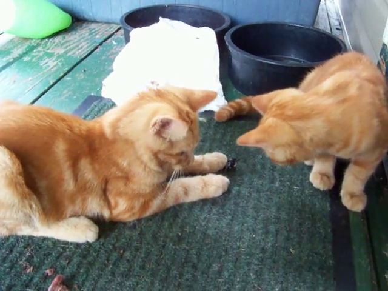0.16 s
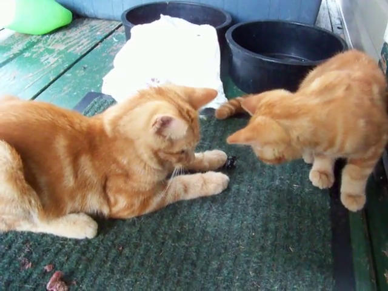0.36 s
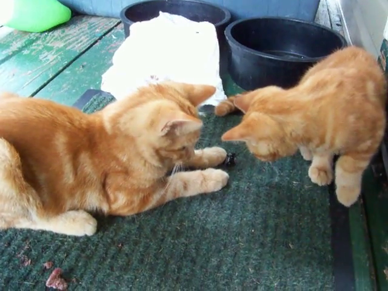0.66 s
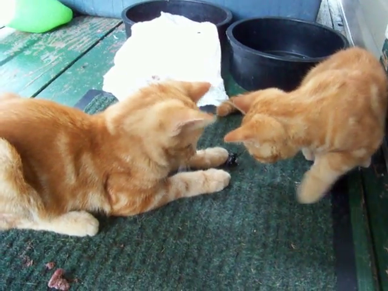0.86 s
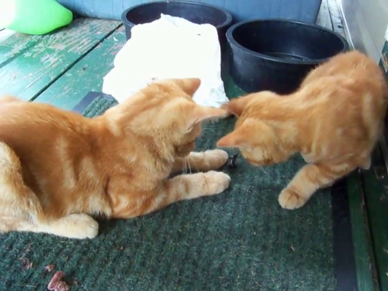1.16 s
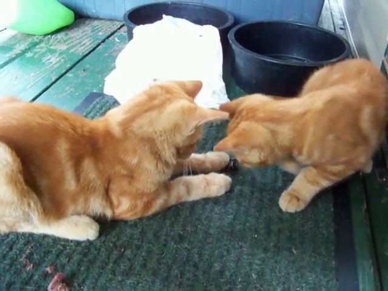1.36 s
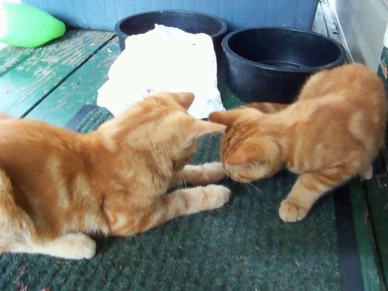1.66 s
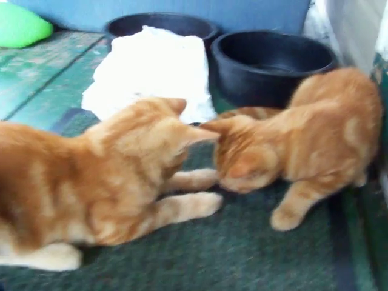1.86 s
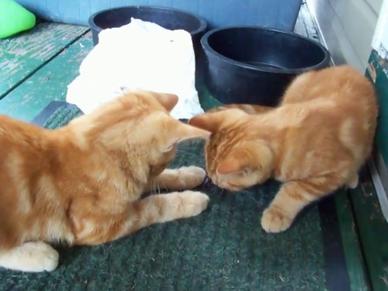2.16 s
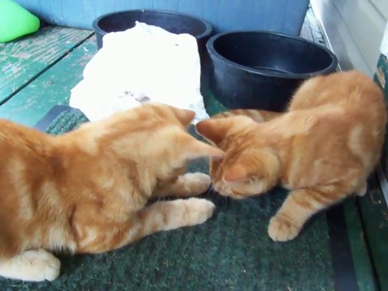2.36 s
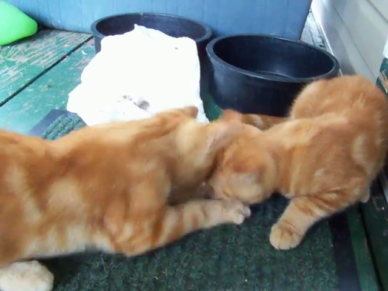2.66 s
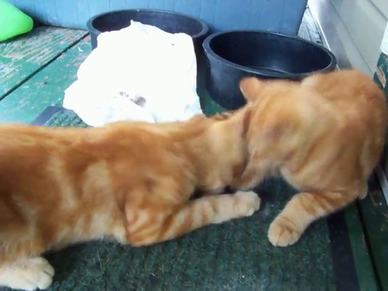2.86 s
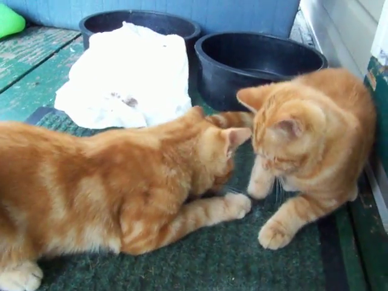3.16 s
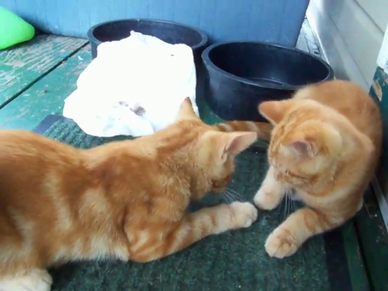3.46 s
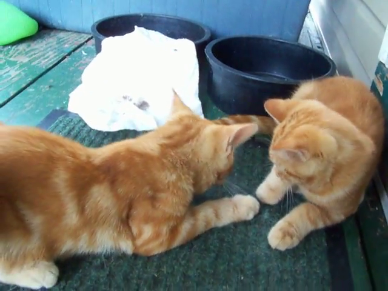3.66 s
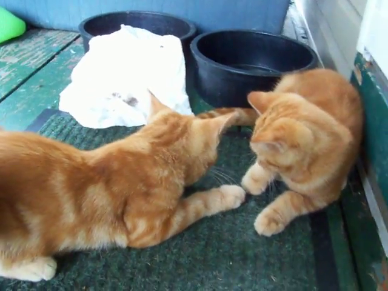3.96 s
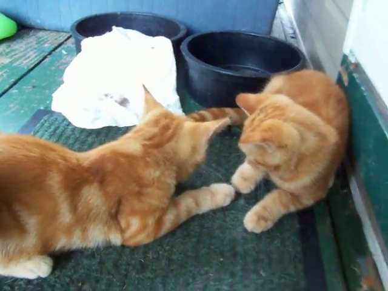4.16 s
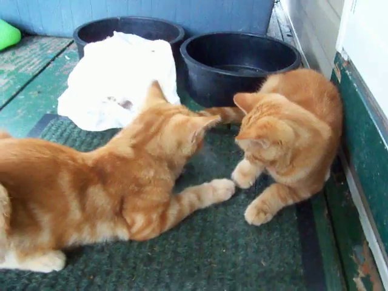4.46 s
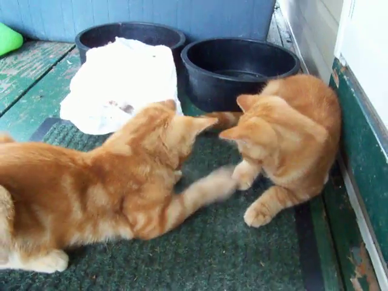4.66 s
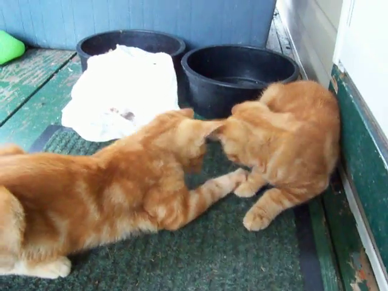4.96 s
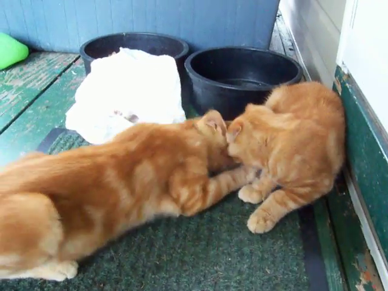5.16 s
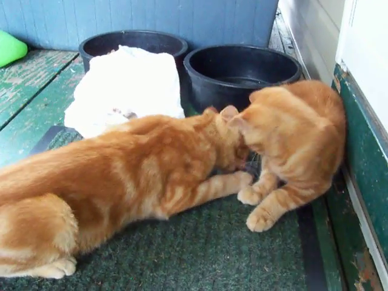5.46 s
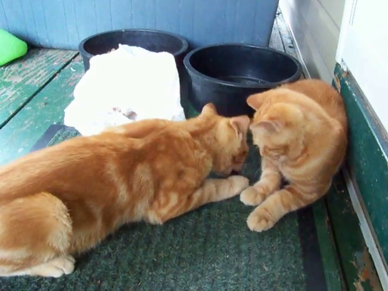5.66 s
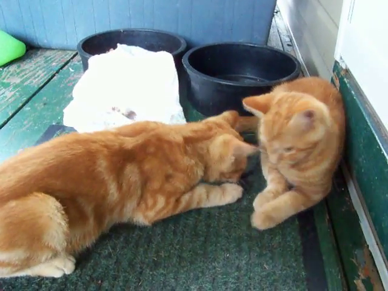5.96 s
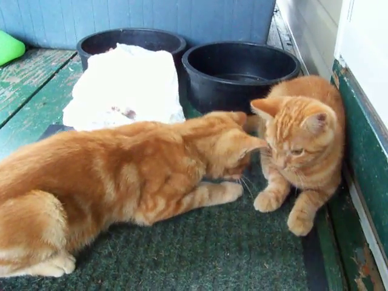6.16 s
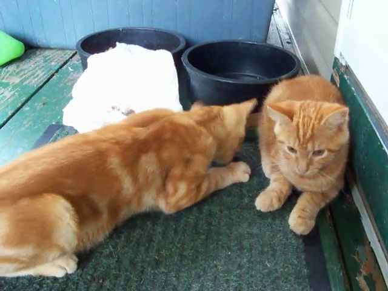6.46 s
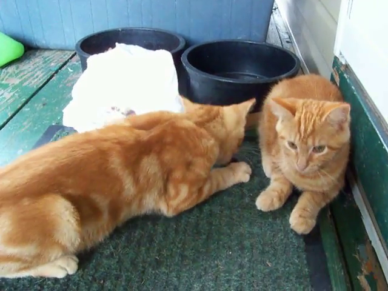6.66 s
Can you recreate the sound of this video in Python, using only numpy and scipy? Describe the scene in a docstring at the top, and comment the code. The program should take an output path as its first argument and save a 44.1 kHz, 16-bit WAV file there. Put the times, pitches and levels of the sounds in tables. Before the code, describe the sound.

A cicada held under kittens' paws buzzes very close to a small overdriven camera microphone. The first second or so is irregular, stuttering and full of harsh crackles; then longer rasping buzzes follow with tiny gaps, muffled and brightened as the insect is covered and turned. Close porch walls add a short flutter. Faint traffic rumble and hiss recede behind. The cats make no sound.

```python
"""A caught cicada buzzes in broken bursts on a porch mat, turned and covered by kittens' paws.
Its two tymbals buckle in turn, rib after rib, each click ringing tymbal and abdomen; dull low ticks
from the overdriven microphone lie under loud strokes. Close walls add a short flutter; far traffic,
shaped from noise, fades over a steady deep rumble. A small camera samples at 16 kHz: the hardest strokes
overflow its converter, so single samples wrap round to the opposite rail and crackle."""
import sys
import numpy as np
from scipy import signal
from scipy.fft import rfft, irfft, next_fast_len
from scipy.io import wavfile

SR = 44100
rng = np.random.default_rng(int(sys.argv[2]) if len(sys.argv) > 2 else 0)


def magnitude_from_level(level_db):
    """Linear magnitude for a level in decibels (20 dB per decade)."""
    exponent = np.asarray(level_db, float) / 20
    return 10 ** exponent


def materialize(psi):
    """Save the field psi as 16-bit PCM at rate SR to the path in sys.argv[1].

    A 1-D psi becomes a single channel; in a 2-D psi each row is a channel.
    """
    bounded = np.clip(np.atleast_2d(psi).T, -1, 1)
    quanta = np.round(bounded * 32767).astype(np.int16)
    wavfile.write(sys.argv[1], SR, quanta)


N = 300321

# Bursts of the buzz. Each row: start in seconds, end in seconds.
BURSTS = [(0, .25), (.261, .36), (.462, .868), (.901, .908), (.945, 1.078), (1.125, 1.24), (1.251, 1.275),
          (1.285, 1.297), (1.407, 1.415), (1.431, 2.158), (2.177, 2.183), (2.208, 2.99), (3.01, 3.195),
          (3.206, 3.262), (3.272, 3.502), (3.515, 3.602), (3.618, 3.727), (3.738, 3.897), (3.914, 4.222),
          (4.231, 4.336), (4.348, 5.578), (5.622, 6.81)]
# Muscle rate. Each row: time in seconds, cycles per second.
MUSCLE_RATE = [(0, 74.5), (.3, 66.2), (.85, 75.2), (1.08, 50.9), (1.3, 59), (1.6, 79.6), (1.78, 88.4),
               (1.92, 66), (2.14, 82.7), (2.5, 83), (2.85, 93.5), (3.4, 91.3), (3.7, 87.6), (5.2, 88.5),
               (5.6, 88.2), (5.82, 82.3), (6.3, 85.9), (6.6, 102), (6.81, 81)]
# Manner of the rhythm. Each row: time in seconds, lag of the second tymbal as a share of a cycle,
# second tymbal in dB against the first, timing jitter in ms, swell time of a tymbal click in ms,
# trim of the later ribs in dB.
RHYTHM = [(0, 0.48, 1, 0.98, 0.22, 3.5), (1.3, 0.46, 1, 0.92, .2, -0.5), (1.6, 0.48, -3, 0.39, .28, 5.5),
          (2.4, 0.47, 0, 0.71, 0.24, -2), (2.85, 0.44, -8.5, 0.17, .28, -11.5),
          (3.1, 0.45, -9.5, 0.042, 0.25, -11.5), (4.2, .37, -7, .08, .4, -4),
          (4.7, 0.37, -1.5, 0.15, 0.32, 4.5), (5.8, 0.3221, 0.5, .27, 0.29, -3),
          (6.81, .4, -6.5, 0.26, 0.24, 2)]
BURST_SAG_DB = -2.5   # a burst weakens by this from its start to its end

# Ribs buckling within a stroke. Each row: delay after the first in ms, relative level in dB before trims.
RIBS = [(0, 1.5), (1.298, -11.5), (2.703, -6.5), (3.599, -11)]
# How much reaches the camera as the insect is turned and covered.
# Each row: time in seconds, tymbal ring trim in dB, abdomen rings trim in dB.
COVERING = [(0, -14, -24.5), (.36, -23, -24), (.84, -17, -22.5), (.9, -26, -26.5), (1.0, -19, -28.5),
            (1.24, -19, -26.5), (1.3, -28.5, -30.5), (1.5, -19.5, -30.5), (1.62, -18.5, -23),
            (2.16, -16, -26), (2.53, -15.5, -20.5), (2.61, -22.5, -24.5), (2.72, -6.5, -17.5),
            (2.775, -8, -19.5), (2.8, -19.5, -27.5), (2.86, -15, -25), (2.96, -39, -38),
            (3.02, -32.5, -35.5), (3.19, -29.5, -31.5), (3.21, -26, -29), (3.26, -31.5, -30),
            (3.28, -25.5, -35.5), (3.4, -17.5, -34.5), (3.7, -20, -35), (4.1, -26, -34.5), (4.3, -17, -38),
            (4.4, -11.5, -27), (4.65, -22.5, -23.5), (4.73, -22, -26), (4.83, -18, -25), (4.9, -21, -26),
            (5.08, -13.5, -23), (5.22, -18.5, -27.5), (5.27, -26, -28), (5.33, -21, -28.5), (5.4, -32, -37),
            (5.45, -23.5, -29.5), (5.85, -26.5, -30), (6.05, -13, -23.5), (6.1, -26, -31), (6.28, -17, -22),
            (6.4, -24.5, -28), (6.46, -17, -21.5), (6.81, -18.5, -21)]
# Colour of the rings as the body is bent and pressed. Each row: time in seconds, main ring centre in Hz,
# low ring centre in Hz, trim of the middle ring in dB.
POSTURE = [(0, 6440, 5000, 1), (.5, 6410, 5100, 3), (1.4, 6483, 5160, 2), (1.8, 6436, 4950, 0),
           (2.4, 6560, 4750, 1), (2.85, 6660, 4660, -0.5), (3.1, 7070, 4600, 5), (3.25, 7020, 4530, 3.5),
           (3.3, 6980, 4464, 2), (3.6, 6810, 4430, -2), (4.25, 6980, 4338, 5), (4.5, 6898, 4800, 2),
           (4.7, 7130, 4650, -4.5), (4.9, 6970, 4630, -2), (5.3, 6830, 4704, -4.5), (5.5, 6852, 4560, -1.5),
           (6.05, 6850, 4670, -5), (6.3, 7000, 4680, -4), (6.4, 6950, 4760, -2.5), (6.81, 6710, 4650, -8)]
LOW_SPLIT = .06   # the low ring is a pair of modes this share above and below its centre
# a broad faint ring below the low one: centre, trim, swell
SKIRT_HZ, SKIRT_DB, SKIRT_SWELL_MS = 3687, -19.5, .13

# Lone hard strokes, each heard as one crack. Each entry: time of the crest in seconds.
HARD_STROKES = [.0122, .0378, .1133, .1333, .179, .1875, .2081, .2225, .2395, .2786, .2836, .313, .3451,
                .4812, .512, .5434, .5638, .6011, .6166, .6309, .6455, .6756, .6892, .7018, .7312, .7476,
                .8588, 1.0363, 1.1305, 1.1816, 1.2163, 1.6001, 1.6127, 1.6248, 1.6515, 1.665, 1.879, 2.179,
                4.3261, 4.4056, 4.4169, 4.4284, 4.997, 5.128]
# Runs rich in hard strokes. Each row: start in seconds, end in seconds, chance that a stroke is hard.
HARD_RUNS = [(.055, .095, .95), (.144, .168, .95), (.787, .83, .85), (1.748, 1.838, .85), (1.902, 2.04, .6),
             (2.04, 2.143, .85), (2.217, 2.286, .65), (2.311, 2.44, .78), (2.476, 2.51, .9),
             (2.51, 2.576, .4), (2.702, 2.777, .8)]
# height of a hard stroke's first click as it leaves the tymbal, and its swell
LONE_CREST, RUN_CREST, HARD_SWELL_MS = 1.03, 1.03, .17
USUAL_CREST = .5    # ceiling on the main ring of an ordinary click
SWING_LIMIT = .58   # the summed rings, cracks apart, level off at this height

# Spells of dull low ticks under loud strokes, from the overdriven microphone.
# Each row: start in seconds, end in seconds, typical energy of a tick in dB.
DULL_TICKS = [(0.952, 1.25, -66.5), (1.447, 1.75, -68), (2.8, 2.95, -73.5), (4.444, 4.75, -72.5),
              (4.798, 4.86, -68.5), (4.951, 5.14, -65.5), (5.361, 5.45, -71.5), (5.972, 6.08, -69.5),
              (6.244, 6.36, -67)]
TICK_HZ, TICK_SWELL_MS, TICK_SPREAD_DB = 2800, 0.062, 3

# Far traffic. Each row: time in seconds, rumble level in dB, tyre roar level in dB, roar centre in Hz,
# hiss level in dB.
TRAFFIC = [(0, -39, -41, 799.6, -38), (1.3, -40.5, -44.5, 804, -35), (2.9, -44, -53.5, 709.3, -40.5),
           (3.5, -46, -54, 642.5, -42), (4.2, -42, -85, 475, -44), (5.5, -47, -81, 475, -47.5),
           (6.81, -50.5, -68.5, 415, -50.5)]
# Colour of the far hiss. Each row: frequency in Hz, relative density in dB.
AIR = [(20, 0), (300, -12.5), (1000, -18), (2000, -22), (4000, -24), (8000, -30)]
GROUND_DB = -47   # steady deep rumble, rms

CAMERA_SR, RAIL = 16000, .8   # sampling rate in Hz, and the height at which the converter overflows
# Converter filter before sampling. Each row: frequency in Hz, gain in dB.
ANTI_ALIAS = [(10, -22), (40, -2.5), (7300, 0), (7700, 4.5), (7950, -19), (8200, -55)]
# Playback filter, through which a mirror of the top band leaks. Each row: frequency in Hz, gain in dB.
PLAYBACK = [(10, 6.5), (5000, -0.5), (7200, 1.5), (8000, -8), (8600, -18), (9000, -32), (9500, -75)]
# Camera motor notches. Each row: frequency in Hz, width in Hz.
NOTCHES = [(300, 52.6), (980, 53)]


def rms_one(x):
    """Scale to rms 1."""
    return x / np.sqrt(np.mean(x ** 2) + 1e-20)


def read(rows, s):
    """Columns of a curve at times s."""
    t, *columns = np.transpose(rows)
    return [np.interp(s, t, c) for c in columns]


def colour(x, points):
    """Filter by a table of Hz and dB, drawn straight over log frequency."""
    size = next_fast_len(len(x) + 4096)
    hz = np.maximum(np.arange(size // 2 + 1) * SR / size, 1)
    table = np.array(points, float)
    gain_db = np.interp(np.log(hz), np.log(table[:, 0]), table[:, 1])
    return irfft(rfft(x, size) * magnitude_from_level(gain_db), size)[:len(x)]


def strokes():
    """Stroke times, dB and looseness: each burst restarts the rhythm, two tymbals a cycle, and sags."""
    rows = []
    for begin, end in BURSTS:
        s = np.arange(begin, end, .001)
        turns = np.cumsum(read(MUSCLE_RATE, s)[0]) * .001
        first = np.interp(np.arange(np.ceil(turns[-1])), turns, s)
        lag, second_db, jitter_ms = read(RHYTHM, first)[:3]
        second = first + np.clip(lag, .2, .6) / read(MUSCLE_RATE, first)[0]
        both = np.stack([first, second], 1)
        wander = rng.standard_normal((120, 2))[:len(first)] * jitter_ms[:, None] / 1000
        both = both + wander * (both > s[0])   # the stroke that opens a burst stays on time
        sag = BURST_SAG_DB * ((both - begin) / (end - begin) - .5)
        db = np.stack([0 * lag, second_db], 1) + sag
        keep = both < s[-1]
        rows.append([both[keep], db[keep], np.stack([jitter_ms, jitter_ms], 1)[keep]])
    return np.concatenate(rows, axis=1)


def hard_strokes(s, db):
    """Crest height of hard strokes (else 0); the crest meets a camera sample, for lone ones on time."""
    s, draw = s.copy(), rng.random(2000)[:len(s)]
    in_run = sum((s > begin) & (s < end) & (draw < share) for begin, end, share in HARD_RUNS) > 0
    crest = RUN_CREST * in_run
    rise = 2 * HARD_SWELL_MS / 1000   # a click crests two swell times in
    for crest_s in HARD_STROKES:
        k = np.argmin(np.abs(s - crest_s) - db / 2000)   # a near stroke, favouring loud ones
        s[k], crest[k] = crest_s - rise, LONE_CREST
    on_sample = np.round((s + rise) * CAMERA_SR) / CAMERA_SR - rise
    return np.where(crest > 0, on_sample, s), crest


def rings(start_s, gain, hz, swell_ms, phase):
    """Each click swells and dies as a short tone, its energy set by gain and not by swell time."""
    t = np.arange(260) / SR
    at = np.round(start_s * SR).astype(int)
    swell = swell_ms[:, None] / 1000
    shape = (t / swell) ** 2 * np.exp(-t / swell) / np.sqrt(3 / 8 * swell)
    # phase counts from the crest, true to a fraction of a sample
    from_crest = t - 2 * swell + (at / SR - start_s)[:, None]
    tone = gain[:, None] * shape * np.cos(2 * np.pi * hz[:, None] * from_crest + phase[:, None])
    return np.bincount((at[:, None] + np.arange(260)).ravel(), tone.ravel(), N + SR)[:N]


def cicada(stroke_db=1.0, rib_db=1.0):
    """Rib clicks ring the tymbal and the hollow abdomen at three main pitches, over a faint broad skirt."""
    s, db, loose = strokes()
    chance = rng.standard_normal((2000, len(RIBS), 10))[:len(s)]
    db = db + stroke_db * np.sqrt(loose) * chance[:, 0, 0]
    phase = rng.uniform(0, 2 * np.pi, 2000)[:len(s)]
    s, crest = hard_strokes(s, db)
    phase = np.where(crest > 0, np.pi * (phase > np.pi), phase)   # hard strokes crest straight up or down

    ribs = np.array(RIBS)
    start = np.maximum(s[:, None] + ribs[:, 0] / 1000, 0).ravel()
    main_db, low_db = read(COVERING, start)
    main_hz, low_hz, middle_db = read(POSTURE, start)
    swell_ms, later_db = read(RHYTHM, start)[3:]
    later = np.tile(np.arange(len(RIBS)) > 0, len(s))
    hard_first = np.repeat(crest > 0, len(RIBS)) & ~later
    swell_ms = np.where(hard_first, HARD_SWELL_MS, swell_ms)
    # faster cycling shares the same power among more clicks
    level = (db[:, None] + ribs[:, 1]).ravel() + later * later_db
    level = level - 10 * np.log10(read(MUSCLE_RATE, start)[0]) - 7.5

    # a loose rhythm also makes strength, pitch and phase of the clicks less alike
    chance = (chance * np.sqrt(loose)[:, None, None]).reshape(-1, 10).T
    phase = np.repeat(phase, len(RIBS)) + 2.0 * chance[1:4] * [later, later + 1, later + 1]
    detune = 1 + [[.03], [.015], [.015]] * chance[[5, 7, 9]]

    unit = np.sqrt(3 / 8 * swell_ms / 1000) * np.exp(2) / 4   # gain that makes a click crest at 1
    strength = np.minimum(magnitude_from_level(level + main_db + rib_db * later * chance[4]), USUAL_CREST * unit)
    hard = np.repeat(crest, len(RIBS)) * ~later * unit
    level = np.where(hard > 0, level - 19, level)   # a hard first click is nearly all tymbal
    body_db = level + low_db
    crack = rings(start, hard, main_hz * detune[0], swell_ms, phase[0])
    main = rings(start, strength * (hard == 0), main_hz * detune[0], swell_ms, phase[0])
    body_swell = 0 * swell_ms + .42
    middle_gain = magnitude_from_level(body_db + middle_db + rib_db * chance[6])
    middle = rings(start, middle_gain, 5680 * detune[1], body_swell, phase[1])
    low_gain = magnitude_from_level(body_db - 1.5 + rib_db * chance[8])
    low = sum(rings(start, low_gain, low_hz * (detune[2] + side * LOW_SPLIT), body_swell, side * phase[2])
              for side in (-1, 1))
    skirt_gain = magnitude_from_level(body_db + SKIRT_DB + rib_db * chance[6])
    skirt = rings(start, skirt_gain, SKIRT_HZ * detune[0], 0 * swell_ms + SKIRT_SWELL_MS, phase[2])
    return level_off(main + middle + low + skirt) + crack + dull_ticks(s)


def level_off(x):
    """The swing follows small drives freely and bends over at its limit."""
    swing = np.abs(signal.hilbert(x, next_fast_len(N))[:N])
    return x / (1 + (swing / SWING_LIMIT) ** 6) ** (1 / 6)


def dull_ticks(s):
    """The overdriven microphone leaves a dull uneven tick under each stroke of a spell."""
    gain = sum(magnitude_from_level(db) * ((s > begin) & (s < end)) for begin, end, db in DULL_TICKS)
    chance = rng.standard_normal((2000, 3))[:len(s)].T
    gain = gain * magnitude_from_level(TICK_SPREAD_DB * chance[0])
    hz = TICK_HZ * magnitude_from_level(2.5 * chance[1])
    return rings(np.maximum(s, 0), gain, hz, 0 * s + TICK_SWELL_MS, np.pi * chance[2])


def porch(x, t60=0.093, early_ms=26.0, early_db=-12.5, late_db=-10.5):
    """Close walls give a dense early flutter and a short tail."""
    t = np.arange(SR // 4) / SR
    early = rms_one(rng.standard_normal(len(t)) * np.exp(-t * 1000 / early_ms))
    late = rms_one(rng.standard_normal(len(t)) * magnitude_from_level(-60 * t / t60))
    walls = (magnitude_from_level(early_db) * early + magnitude_from_level(late_db) * late) / np.sqrt(len(t))
    return x + signal.fftconvolve(x, walls)[:N]


def traffic():
    """Rumble peaking near 200 Hz, a tyre roar whose centre sinks as the cars draw away, and broad hiss."""
    rumble_db, roar_db, roar_hz, hiss_db = read(TRAFFIC, np.arange(N) / SR)
    rumble = rms_one(colour(rng.standard_normal(N), [
        (20, -18.0), (70, -12.5), (140, 2), (175, 9.5), (230, 5.5), (330, -9.5), (600, -22), (2000, -68.5)]))
    # two slow noises on a moving carrier make a band of noise around the roar's centre
    band = rms_one(signal.lfilter(*signal.butter(2, 170, fs=SR), rng.standard_normal((2, N))))
    turn = 2 * np.pi * np.cumsum(roar_hz) / SR
    roar = band[0] * np.cos(turn) + band[1] * np.sin(turn)
    hiss = rms_one(colour(rng.standard_normal(N), AIR))
    return magnitude_from_level(rumble_db) * rumble + magnitude_from_level(roar_db) * roar + magnitude_from_level(hiss_db) * hiss


def deep_rumble():
    """Steady noise weighted to the lowest octaves."""
    ground = rms_one(colour(rng.standard_normal(N), [(15, -4), (45, -9.5), (90, -8.0), (200, -30)]))
    return magnitude_from_level(GROUND_DB) * ground


def scene():
    """Insect on the porch over traffic and deep rumble."""
    return (porch(cicada()) + traffic() + deep_rumble())[None]


def band_limit(x):
    """A steep low-pass at the top of the band."""
    return signal.sosfilt(signal.butter(12, 16400, fs=SR, output="sos"), x)


def record(dry):
    """Sample at the camera rate, overflow, notch, play back through a leaky filter, limit."""
    x = dry[0] + 0.09 * dry[0] ** 2   # a lopsided capsule leaves a dull tick under loud strokes
    x = signal.resample_poly(colour(x, ANTI_ALIAS), 160, 441)
    x = (x + RAIL) % (2 * RAIL) - RAIL   # what passes one rail comes back at the other
    for hz, width in NOTCHES:
        x = signal.lfilter(*signal.iirnotch(hz, hz / width, CAMERA_SR), x)
    # a wide filter lets part of the mirror image above 8 kHz through
    wide = signal.firwin(8821, 10500, fs=441 * CAMERA_SR)
    x = colour(signal.resample_poly(x, 441, 160, window=wide)[:N], PLAYBACK)
    x = np.pad(x, (0, N - len(x)))
    # overshoots are cut flat, and the spray this leaves above the band is damped
    x = np.clip(x, -.7, .7)
    x = colour(x, [(8900, 0), (9500, -11), (15500, -9), (16300, -60)])
    return band_limit(x[None])


dry = scene()
out = record(dry)
materialize(out)
```